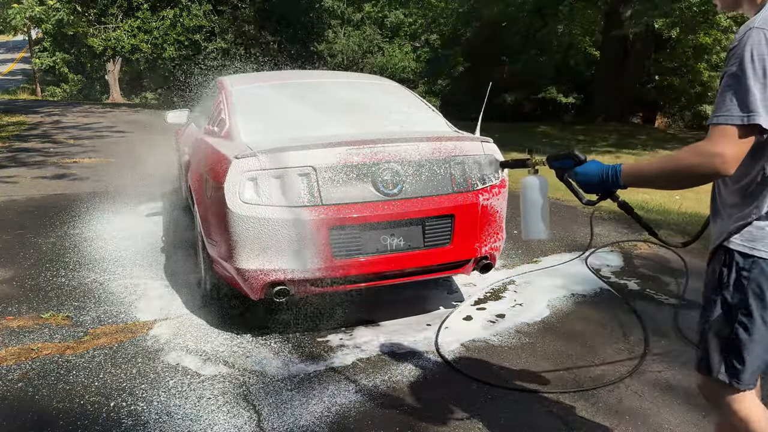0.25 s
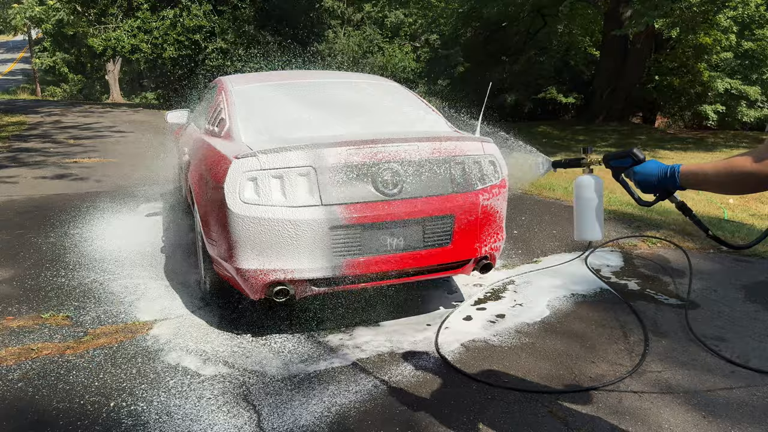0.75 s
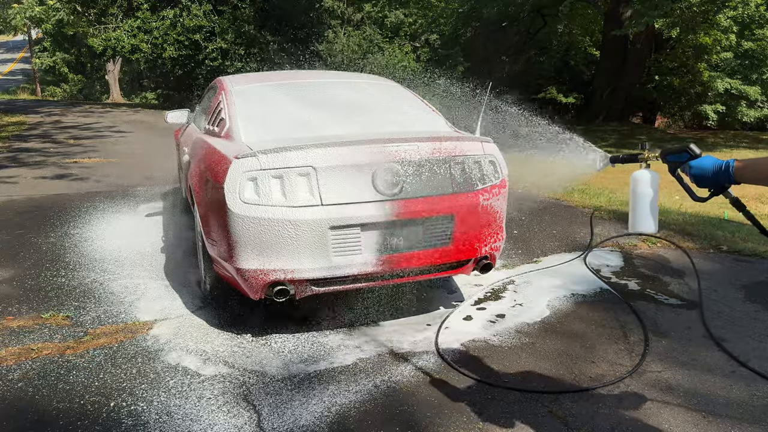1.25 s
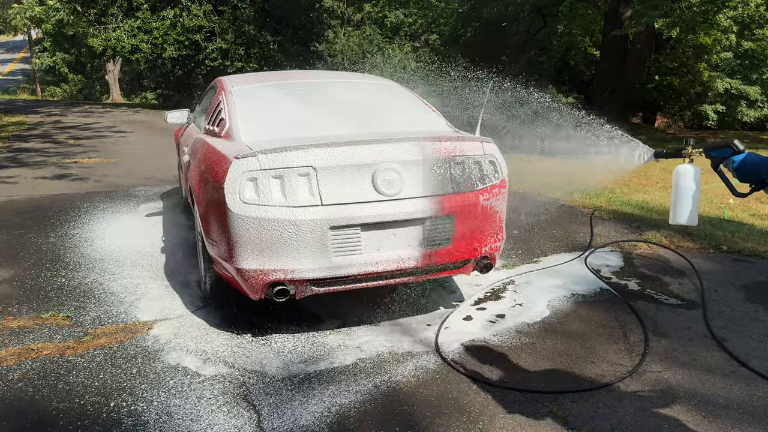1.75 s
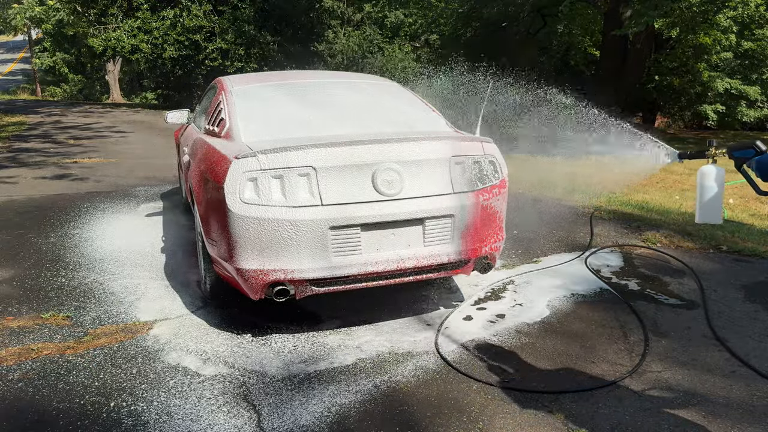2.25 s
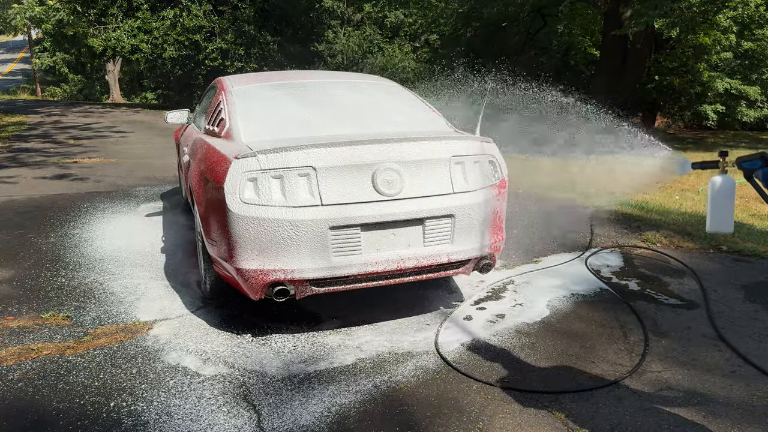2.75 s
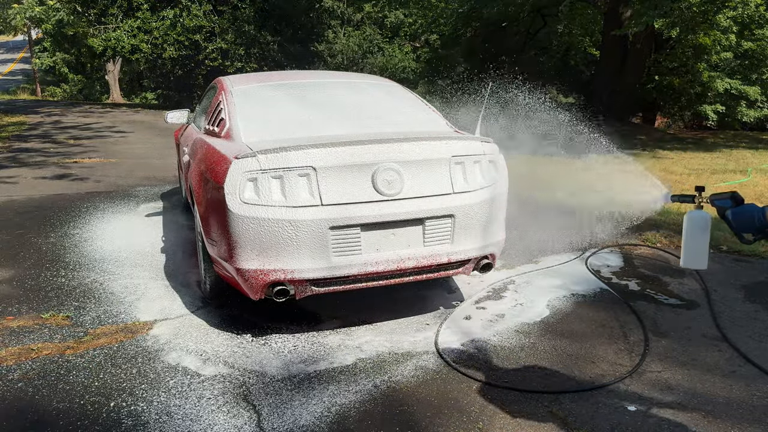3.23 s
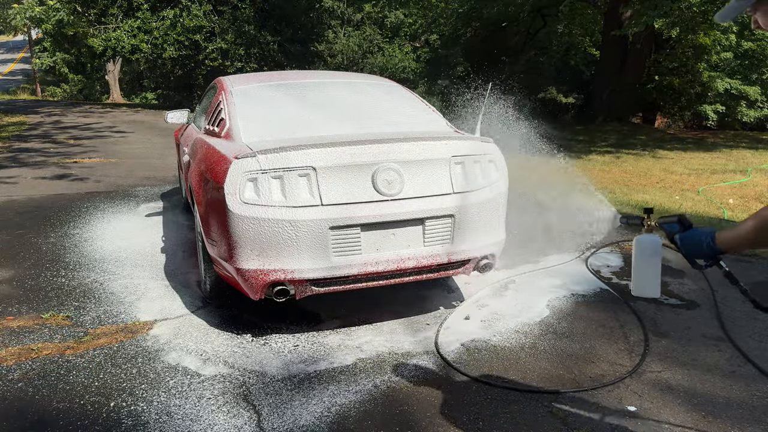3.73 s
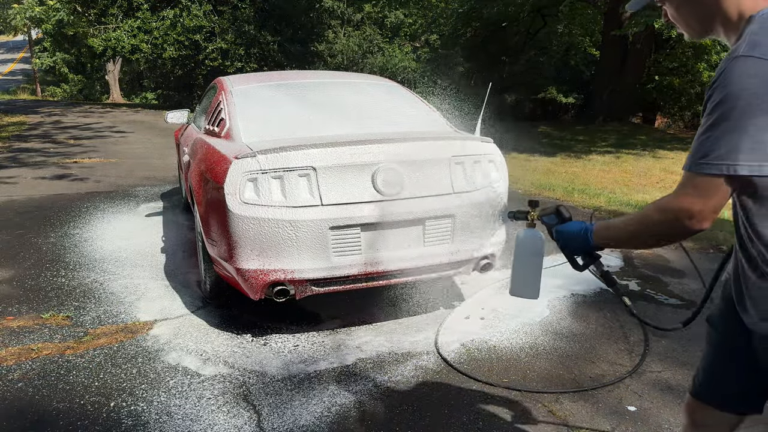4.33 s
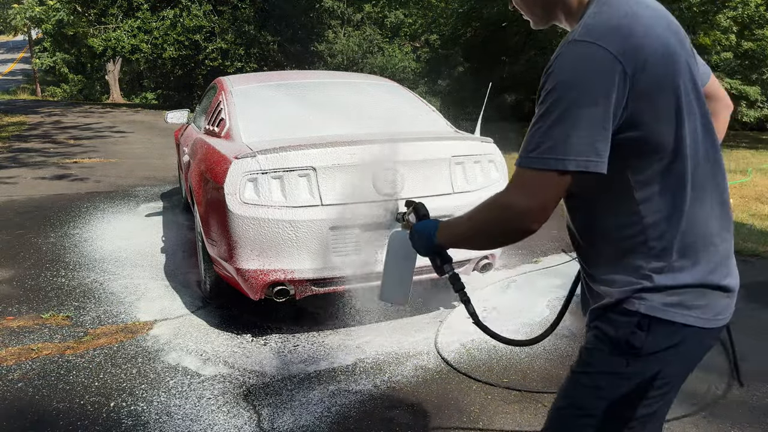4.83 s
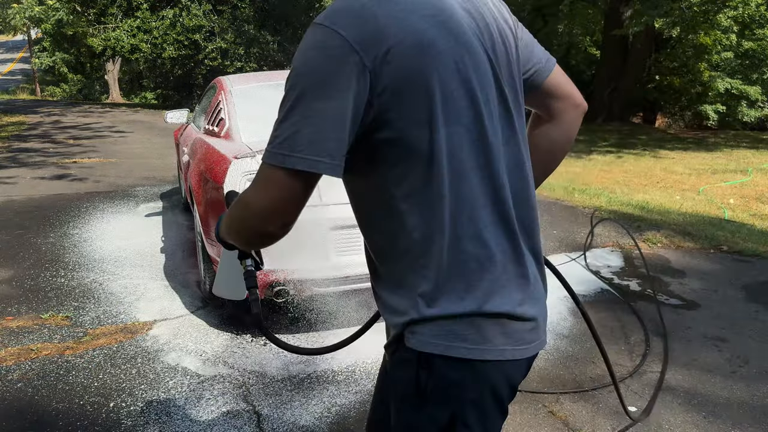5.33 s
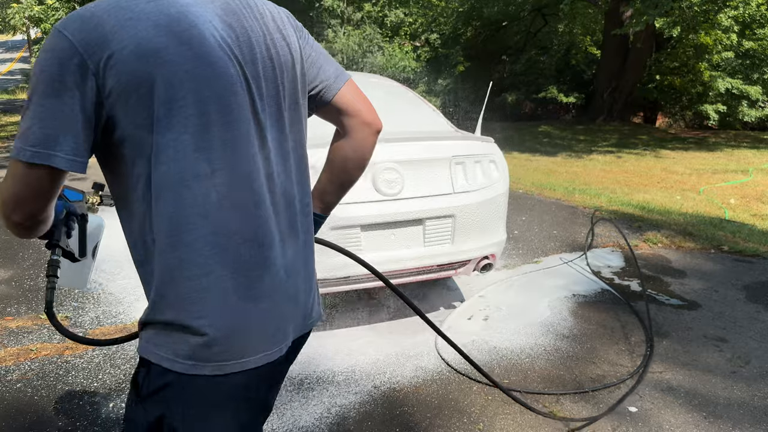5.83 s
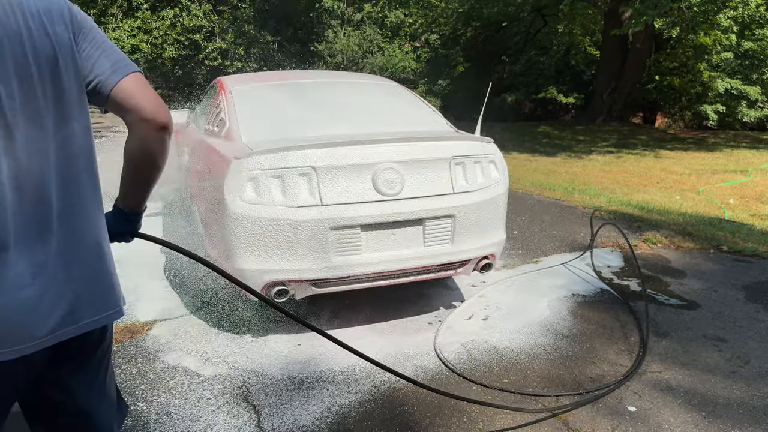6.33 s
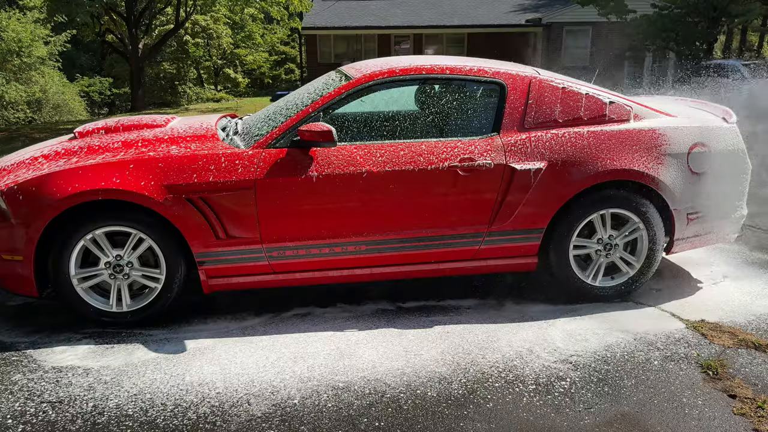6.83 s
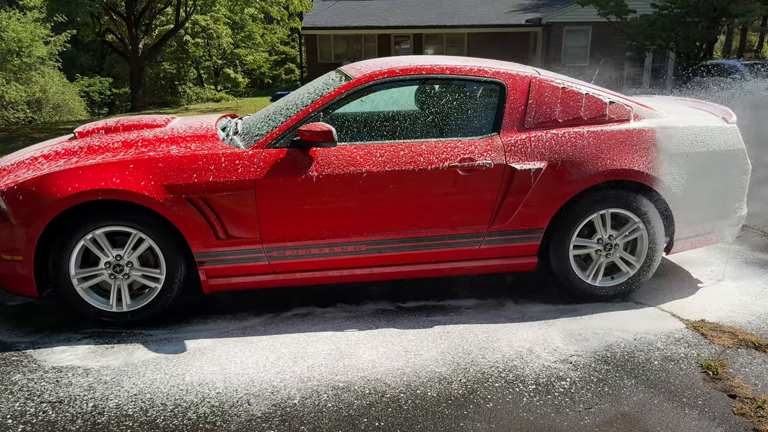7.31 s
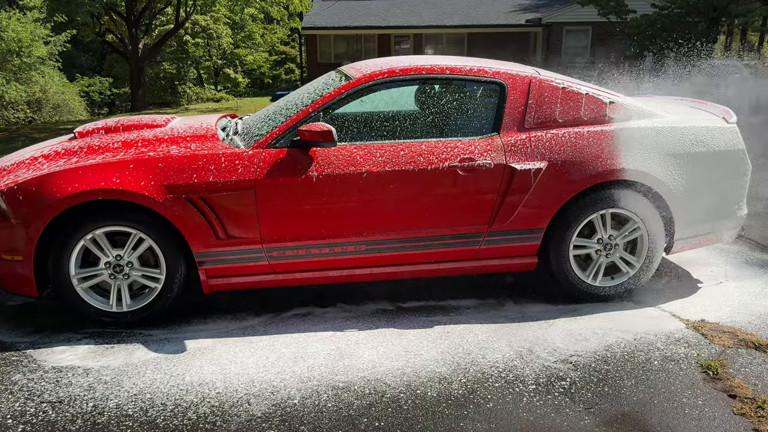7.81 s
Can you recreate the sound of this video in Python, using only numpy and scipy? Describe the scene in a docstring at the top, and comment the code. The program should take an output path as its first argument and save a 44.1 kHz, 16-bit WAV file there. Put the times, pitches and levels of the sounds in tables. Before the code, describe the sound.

A rapid, throaty engine drone runs throughout, its clatter mixing with a bright foam spray. The hiss swells and thins as the gun moves back and returns, foam pattering on metal and fizzing finely. The person steps across in front, dulling the hiss, with a tiny scuff. A cut to the car's side makes the motor softer and the spray more distant, then slowly nearer. Open air, stereo pickup.

```python
"""Pressure washer and foam cannon

A petrol pressure washer thuds steadily, built as harmonics of its firing rate under a clatter of shaped noise.
A foam cannon sprays a car on an asphalt drive: a rush of noise, combed by bounces off ground and car, sweeps
as the gun moves. Foam patters and fizzes as noise with random impacts, and shoes scuff as short bursts.
Near the end the listening point jumps from behind the car to beside it, where the car shields the engine."""
import sys
import numpy as np
from scipy import signal
from scipy.fft import rfft, irfft, next_fast_len
from scipy.io import wavfile
from scipy.ndimage import map_coordinates

SR = 44100
rng = np.random.default_rng(int(sys.argv[2]) if len(sys.argv) > 2 else 0)


def waveform_to_disk(signal):
    """Save audio, clipped to [-1, 1], as 16-bit WAV at the path in sys.argv[1]."""
    frames = np.transpose(np.atleast_2d(signal))
    scaled = np.clip(frames, -1, 1) * 32767
    samples = np.round(scaled).astype(np.int16)
    wavfile.write(sys.argv[1], SR, samples)


N = 355887
TIME = np.arange(N) / SR
JUMP_S = 6.765  # the listening point moves from behind the car to beside it

# one-cylinder four-stroke engine: firings per second
FIRING_HZ = 27.939
# the governor hunts: size of the slow drift (cycles) and its random knots per second
HUNT_CYCLES, HUNT_RATE = 0.009, 4
JITTER_CYCLES = 0.0009  # each firing also comes a little early or late
# the bark varies from firing to firing: spread (dB), reached in full above (Hz)
UNEVEN_DB, UNEVEN_HZ = 0.9, 240
TRAP_HZ = 100  # tuning of the muffler's side chamber
# each firing kicks the pump: moment in the cycle, briefness, kick of the spray and of the clatter (dB)
KICK_AT, KICK_SHARPNESS, SPRAY_KICK_DB, CLATTER_KICK_DB = .52, 3.5, .75, 2.0

# strength of the bounces: off the ground behind and beside the car, and off the car (gain)
GROUND_SHARE, GROUND_SHARE_BESIDE, CAR_SHARE = .56, .7, .18
# the hand on the gun is unsteady: spread of the ground's and the car's bounce delay (ms)
TREMBLE_MS, CAR_TREMBLE_MS = 0.018, 0.06
# beside the car the gun comes steadily nearer: bounce delay at first (ms) and its growth (ms per s)
BESIDE_BOUNCE_MS, APPROACH_MS_PER_S = 2.146, 0.48
NOZZLE_BESIDE_DB, APPROACH_DB_PER_S = -51.8, 2.2  # level at first, growing as the gun comes nearer
# the foam head's resonance wanders with the flow: spread (Hz), random knots per second
WANDER_HZ, WANDER_RATE = 22, 3
# the gun swings round once and lifts the resonance: middle (s), half length (s), lift (Hz), shift at rest (Hz)
TURN_S, TURN_HALF_S, TURN_HZ, REST_HZ = 4.35, .45, 125.06, -10
# the person spraying steps in front of the gun: start (s), time to cover it (s)
SHADOW_S, SHADOW_RISE_S = 4.9, 1

PATTER_DB, PATTER_BESIDE_DB = 3.5, -47.5  # gain on the patter curve; steady level beside the car
SWEEP_DB, FIZZ_DB = 3, 2.0  # gain on the sweep curve behind the car; further gain on the fizz alone
# the hiss relative to the sweep, behind and beside the car (dB), and its loss behind the person (dB)
HISS_DB, HISS_BESIDE_DB, HISS_SHADOW_DB = -7.5, -12, 6.5
TOP_HZ = 15850  # upper band limit of the whole sound


def amp(db):
    """Decibels to gain."""
    return 10 ** (np.asarray(db) / 20)


def unit(x):
    """Scale to rms 1."""
    return x / np.sqrt(np.mean(x ** 2) + 1e-20)


def curves(rows):
    """One value per sample for each column after the time."""
    s, *cols = np.transpose(rows)
    return [np.interp(TIME, s, c) for c in cols]


def wobble(rate):
    """A smooth random curve, rate knots a second."""
    coarse = TIME[::16]
    knots = rng.standard_normal(int(N * rate / SR) + 4)
    return np.interp(TIME, coarse, map_coordinates(knots, [coarse * rate], mode="nearest"))


def filtered(x, response):
    """x times a complex response of frequency."""
    size = next_fast_len(N + SR // 2)
    spectrum = rfft(x, size) * response(np.fft.rfftfreq(size, 1 / SR))
    return irfft(spectrum, size)[..., :N]


def coloured(x, spectrum):
    """x shaped by (frequency [Hz], level [dB]) points on a log axis, at rms 1."""
    f, db = np.transpose(spectrum)
    return unit(filtered(x, lambda hz: amp(np.interp(np.log(hz + 1), np.log(f), db))))


def delayed(x, ms):
    """x heard later by a delay that may move."""
    return map_coordinates(x, [(TIME - ms / 1000) * SR], mode="mirror")


def placed(x, lag_ms, left_db):
    """A source at both ears: the left one lags and differs in level."""
    left = delayed(x, lag_ms / 2) * amp(left_db / 2)
    right = delayed(x, -lag_ms / 2) * amp(-left_db / 2)
    return np.array([left, right])


def outdoors(x, lag_ms, left_db, scatter_db):
    """A broad noise plus its scatter from trees and walls, unrelated at the two ears."""
    return placed(x, lag_ms, left_db) + amp(scatter_db) * rng.standard_normal((2, N))


def droplets(rate, spread_db):
    """Tiny impacts at random moments, a few much larger than the rest."""
    hit = rng.random(N) < rate / SR
    size_db = spread_db * np.minimum(rng.exponential(size=N), 4)
    return unit(hit * rng.standard_normal(N) * amp(size_db))


def patchy(x, depth_db, width_hz, length_s):
    """x with each region of pitch fluttering on its own."""
    z = signal.stft(x, nperseg=512)[2]
    steps = np.array([SR / 512 / width_hz, 256 / SR / length_s])[:, None, None]
    cells = np.indices(z.shape) * steps
    field = map_coordinates(rng.standard_normal(z.shape), cells, mode="mirror")
    return unit(signal.istft(z * amp(depth_db * field), nperseg=512)[1][:N])


def throb(cycle, at, depth_db):
    """A gain that kicks briefly once in each engine cycle."""
    return amp(depth_db * np.exp(KICK_SHARPNESS * (np.cos(2 * np.pi * (cycle - at)) - 1)))


def jump(behind, beside):
    """Behind the car first, then beside it, with a 5 ms crossfade."""
    moved = np.clip((TIME - JUMP_S) * 200, 0, 1)
    return behind * (1 - moved) + beside * moved


def exhaust(cycle, note, ring, muffler_hz, echo, echo_s, trap_width_hz):
    """Puffs summed from harmonics; muffler, side chamber and a wall's echo set their phases, hence the shape."""
    # level of the upper tones: (time [s], level [dB])
    bark = [(1.05, .5), (1.35, 0.5), (1.65, 0), (3.5, 0.4), (5.45, -0.8), (5.95, -0.5), (6.25, 0),
            (6.76, -0.2)]
    bark_db = curves(bark)[0] + UNEVEN_DB * wobble(FIRING_HZ)
    puffs = 0
    for order, db in note:
        hz = order * FIRING_HZ
        muffler = ring * np.arctan(hz / muffler_hz)
        chamber = np.arctan(trap_width_hz * hz / (TRAP_HZ ** 2 - hz ** 2))
        echoed = np.angle(1 + echo * np.exp(-2j * np.pi * hz * echo_s))
        upper = min(hz / UNEVEN_HZ, 1) ** 2
        tone = np.cos(2 * np.pi * order * cycle - (muffler + chamber) + echoed)
        puffs = puffs + amp(db + upper * bark_db) * tone
    return unit(puffs)


def engine(cycle):
    """Exhaust puffs and the noisy clatter of valves, fan and pump, from the open side, then the shielded one."""
    # exhaust note behind and beside the car: (multiple of the firing rate, relative level [dB])
    note_behind = [(1, -28), (2, 1), (3, -10), (4, -6.5), (5, 2), (6, -10.5), (7, -11), (8, -1), (9, -5.5),
                   (10, -3), (11, -8.5), (13, -10), (14, -15), (15, -14), (16, -21), (17, -15), (19, -22.5),
                   (20, -21.5), (22, -17.5), (24, -21), (25, -21.5), (36, -16.5)]
    note_beside = [(1, -21), (2, 5), (3, -8), (4, -4), (5, 2.5), (6, -10), (7, -14), (8, -6), (9, -4),
                   (10, -4), (11, -5.5), (13, -16), (14, -10), (15, -18), (16, -25), (17, -12.5), (19, -18),
                   (20, -14), (23, -18)]
    # colour of the mechanical noise: (frequency [Hz], relative level [dB per Hz])
    clatter_colour = [(20, -13), (60, -2), (130, -6), (240, -1), (335, -2.5), (480, -6), (650, -2),
                      (820, -6.5), (1000, -4), (1300, -4.5), (1700, -5), (4000, -24), (8000, -50)]
    open_note = exhaust(cycle - .367, note_behind, ring=19.35, muffler_hz=107,
                        echo=.72, echo_s=.02595, trap_width_hz=24)
    shielded_note = exhaust(cycle - .757, note_beside, ring=5.2, muffler_hz=251,
                            echo=.75, echo_s=.01979, trap_width_hz=0)
    firing = amp(0.077 * wobble(28))  # strength varies from firing to firing
    clatter = outdoors(rng.standard_normal(N), lag_ms=0.23, left_db=-3.5, scatter_db=-7)
    clatter = coloured(clatter, clatter_colour) * throb(cycle, KICK_AT, CLATTER_KICK_DB)
    behind = amp(-35.5) * placed(open_note * firing, lag_ms=0.35, left_db=-.5) + amp(-44.0) * clatter
    beside = amp(-42.5) * placed(shielded_note * firing, lag_ms=0.036, left_db=0.0) + amp(-49.5) * clatter
    return jump(behind, beside)


def ground_bounce():
    """Delay in ms of the nozzle's reflection from the asphalt, longer when the gun is nearer."""
    # path of the gun behind the car: (time [s], delay [ms])
    bounce = [(0, 3.45), (.8, 3.44), (1.35, 3.26), (2.0, 3.05), (2.95, 2.82), (3.45, 2.58), (4.0, 2.92),
              (4.2, 3.15), (4.8, 3.34), (5.35, 3.6), (5.75, 3.5), (6.25, 3.04)]
    return jump(curves(bounce)[0], BESIDE_BOUNCE_MS + APPROACH_MS_PER_S * (TIME - JUMP_S))


def nozzle(lag_ms):
    """The jet's resonant noise meets its own bounces off ground and car, which comb it into gliding strands."""
    # the gun backs away from the car's tail and closes in again: (time [s], delay [ms])
    car_bounce = [(0, 2.2), (.5, 2.4), (1.15, 5.05), (2.1, 4.8), (2.9, 5.2), (3.5, 5.0), (4.15, 2.3),
                  (4.45, 2.2), (4.75, 1.7)]
    # the rush as the gun moves and turns behind the car: (time [s], level [dB])
    rush_level = [(0, -42), (.8, -42.5), (1.25, -42.5), (1.7, -43), (2.6, -44.8), (3.2, -44.5), (3.9, -44),
                  (4.3, -43.5), (5.2, -44), (5.45, -45.5), (5.75, -46.5), (6.1, -58)]
    # colour of the rush behind the car, and broader beside it: (frequency [Hz], relative level [dB per Hz])
    colour_behind = [(300, -23), (700, -4), (1030, -4.5), (1400, -4.5), (1560, -3), (1700, 2), (1950, 0),
                     (2280, -2.3), (2520, -8.3), (4000, -21.5), (8000, -39)]
    colour_beside = [(300, -15), (700, -1.5), (1030, -5), (1300, -1), (1550, -2), (1900, 1), (2350, -9),
                     (2800, -16), (4000, -19), (8000, -38)]
    ground_ms = ground_bounce() + TREMBLE_MS * wobble(9)
    car_ms = curves(car_bounce)[0] + CAR_TREMBLE_MS * wobble(5)

    # behind the car the whole rush is shifted in frequency, so its resonance wanders
    turn = np.exp(-((TIME - TURN_S) / TURN_HALF_S) ** 2)
    shift_hz = REST_HZ + TURN_HZ * turn + WANDER_HZ * wobble(WANDER_RATE)
    shift = np.exp(2j * np.pi * np.cumsum(shift_hz) / SR)
    rush = patchy(rng.standard_normal(N), depth_db=1.7, width_hz=130, length_s=.05)
    rush = coloured(rush, colour_behind)
    shifted = np.real(signal.hilbert(rush, next_fast_len(N))[:N] * shift)
    jet = jump(shifted, coloured(rng.standard_normal(N), colour_beside))

    off_ground = jump(GROUND_SHARE, GROUND_SHARE_BESIDE) * delayed(jet, ground_ms)
    off_car = jump(CAR_SHARE, 0) * delayed(jet, car_ms)
    combed = unit(jet + off_ground + off_car)
    scatter = amp(-14) * coloured(rng.standard_normal((2, N)), colour_behind)
    level_db = jump(curves(rush_level)[0], NOZZLE_BESIDE_DB + APPROACH_DB_PER_S * (TIME - JUMP_S))
    ears = unit(placed(combed, lag_ms + 0.0099, left_db=-1.5) + scatter)
    return ears * amp(level_db + 0.26 * wobble(8.6))


def panels(lag_ms, left_db):
    """Foam strikes the bodywork as a dense, fluttering patter of noise and random impacts."""
    # colour of the struck panels: (frequency [Hz], relative level [dB per Hz])
    panel_colour = [(500, -20), (1400, -5), (2200, -2), (2900, -1.5), (4200, -3.5), (5500, -9.5),
                    (7200, -12), (8200, -13.5), (9500, -53)]
    patter = unit(rng.standard_normal(N) + amp(-3.5) * droplets(rate=2200, spread_db=3.5))
    ears = outdoors(patter, lag_ms, left_db, scatter_db=3)
    ears = [patchy(ear, depth_db=1.8, width_hz=700, length_s=.05) for ear in ears]
    return coloured(np.array(ears), panel_colour) * amp(0.55 * wobble(36))


def fizz():
    """Foam tears into mist and bursting bubbles, in quick spurts; the car's body shades its highest part."""
    # colour of the mist: (frequency [Hz], relative level [dB per Hz])
    fizz_colour = [(6000, -41), (7400, -8.5), (8200, -2.5), (9500, 0), (11000, 0.5), (12500, -5),
                   (14000, 3.5), (15400, 5), (16000, -1.5)]
    # boost or cut around 11 kHz behind the car: (time [s], level [dB])
    middle_level = [(0, -2), (.8, 1), (1.7, 1.5), (3.2, 0.5), (4, 1.8), (5.3, 0.3), (6.4, -2)]
    # the right channel's fizz is the left's, turned in phase: (frequency [Hz], left channel's lead [radians])
    phase_lead = [(8100, 0), (15700, -15.9)]
    mist = rng.standard_normal(N) + amp(-9) * droplets(rate=4000, spread_db=5.0)
    mist = coloured(patchy(mist, depth_db=1.0, width_hz=1500, length_s=.04), fizz_colour)
    middle = filtered(mist, lambda hz: (hz > 9600) & (hz < 12600))
    behind = mist + (amp(curves(middle_level)[0]) - 1) * middle
    beside = coloured(mist, [(7500, 1.0), (9000, 6.0), (11000, 4.5), (14500, 1.0)])
    spurts_db = .15 * wobble(10) + .5 * wobble(28) + .3 * wobble(70)
    left = jump(behind, beside) * amp(spurts_db)
    right = filtered(left, lambda hz: np.exp(-1j * np.interp(hz, *np.transpose(phase_lead))))
    return np.array([left, right])


def covered():
    """How far the person's body hides the gun, 0 to 1."""
    return np.clip((TIME - SHADOW_S) / SHADOW_RISE_S, 0, 1)


def hiss(lag_ms):
    """The fan of spray cuts through the air as flickering, coloured noise."""
    # colour of the spray in the air: (frequency [Hz], relative level [dB per Hz])
    hiss_colour = [(2000, -20), (4000, 0), (5500, 0.5), (6500, 1), (7400, -5), (8200, -0.5), (9500, -44)]
    air = outdoors(rng.standard_normal(N), lag_ms, left_db=1.5, scatter_db=-3.0)
    return coloured(air, hiss_colour) * amp(0.7 * wobble(26))


def shoes():
    """Shoes scuff the wet ground in short dull bursts of noise that swell and fade."""
    # each scuff: (time [s], half length [s], level [dB])
    scuffs = [(5.578, 0.015, -42.5), (5.613, 0.012, -48), (5.641, 0.005, -38)]
    strokes = sum(amp(db) * np.exp(-((TIME - s) / half_s) ** 2) for s, half_s, db in scuffs)
    dull = [(250, -25), (380, -2), (650, 0), (800, -18), (2500, -45)]
    return strokes * coloured(rng.standard_normal(N), dull)


def scene():
    """The engine drives the pump, so the whole spray pulses slightly with each firing."""
    # foam striking the bodywork behind the car, ahead of its gain: (time [s], level [dB])
    patter_level = [(0.05, -45.5), (0.98, -48.5), (1.2, -54.5), (1.52, -50), (2.3, -50), (3.05, -51.5),
                    (3.7, -47), (4.05, -47.5), (4.4, -45.5), (5.17, -44.5), (5.38, -47.5), (6.55, -46),
                    (6.76, -49)]
    # the fan of spray sweeps to and fro, behind and beside the car, ahead of gains: (time [s], level [dB])
    sweep_behind = [(0, -43.5), (.3, -44.5), (.45, -44.5), (1.0, -43), (2.45, -42.5), (2.65, -45),
                    (3.0, -47.3), (3.45, -49.3), (3.75, -48), (4.2, -48.5), (4.33, -44.5), (4.95, -45.5),
                    (5.25, -46.5), (6.13, -44.5), (6.2, -43), (6.45, -43), (6.75, -45)]
    sweep_beside = [(6.8, -48.5), (7.22, -46.5), (7.32, -43), (7.6, -45), (7.75, -44.5), (7.92, -42.5),
                    (7.96, -42), (8.03, -47.5)]
    # bearing of the spray: (time [s], lag of the left ear [ms], left minus right on the panels [dB])
    bearing = [(0, -0.048, 9), (3.2, 0.032, 7), (5.2, -0.032, 8), (5.7, 0.17, 13.5), (6.75, 0.12, 7),
               (6.8, 0.15, 0)]
    drift = HUNT_CYCLES * wobble(HUNT_RATE) + JITTER_CYCLES * wobble(FIRING_HZ)
    cycle = FIRING_HZ * TIME + drift
    panels_db = jump(curves(patter_level)[0] + PATTER_DB, PATTER_BESIDE_DB)
    sweep_db = jump(curves(sweep_behind)[0] + SWEEP_DB, curves(sweep_beside)[0])
    hiss_db = sweep_db + jump(HISS_DB - HISS_SHADOW_DB * covered(), HISS_BESIDE_DB)
    lag_ms, left_db = curves(bearing)
    spray = nozzle(lag_ms) + amp(panels_db) * panels(lag_ms, left_db)
    spray = spray + amp(sweep_db + FIZZ_DB) * fizz() + amp(hiss_db) * hiss(lag_ms)
    return engine(cycle) + spray * throb(cycle, KICK_AT, SPRAY_KICK_DB) + shoes()


def record(dry):
    """Both channels share the deep bass, and nothing passes above the band limit."""
    mid, side = (dry[0] + dry[1]) / 2, (dry[0] - dry[1]) / 2
    side = filtered(side, lambda hz: 1 - 1 / (1 + (hz / 85) ** 4))
    return filtered(np.array([mid + side, mid - side]), lambda hz: hz < TOP_HZ)


dry = scene()
out = record(dry)
waveform_to_disk(out)
```